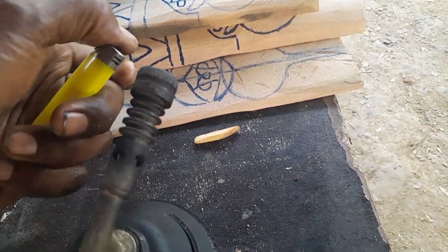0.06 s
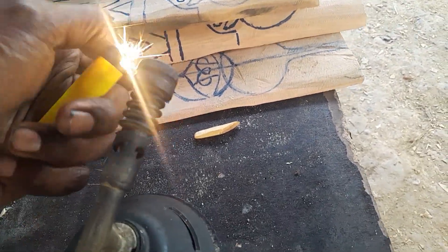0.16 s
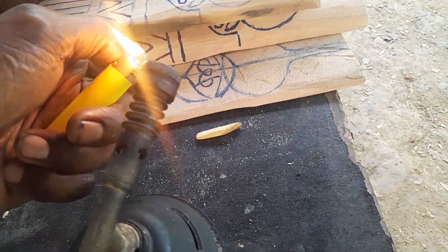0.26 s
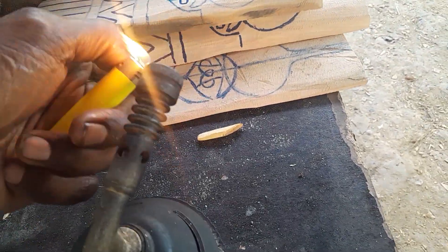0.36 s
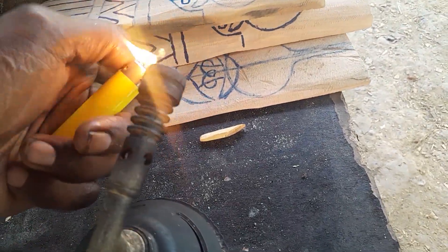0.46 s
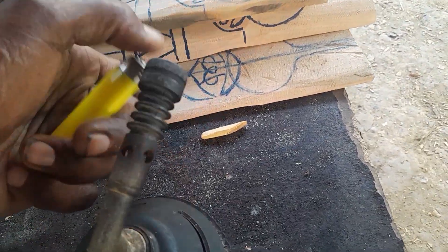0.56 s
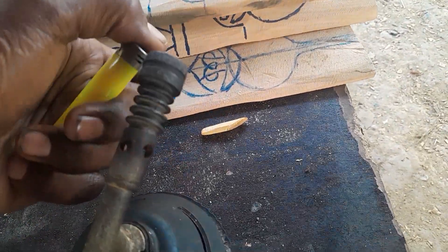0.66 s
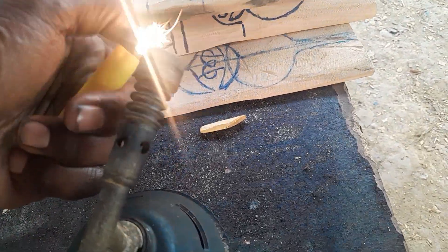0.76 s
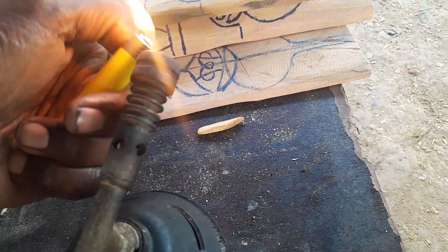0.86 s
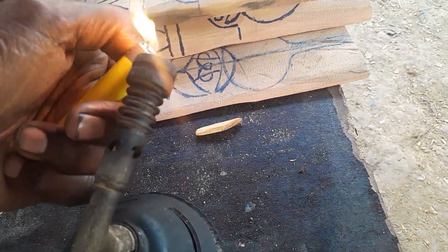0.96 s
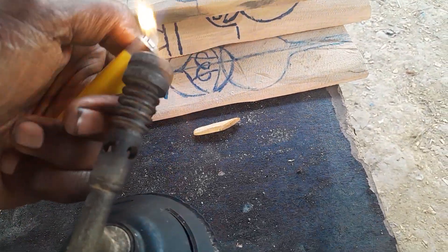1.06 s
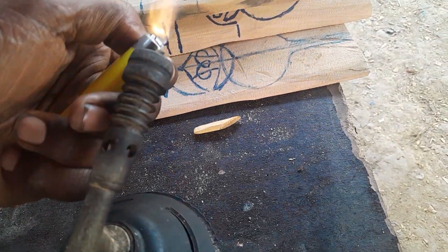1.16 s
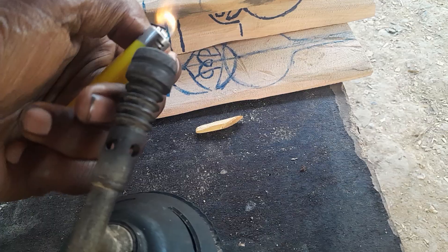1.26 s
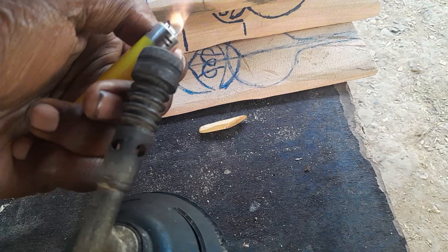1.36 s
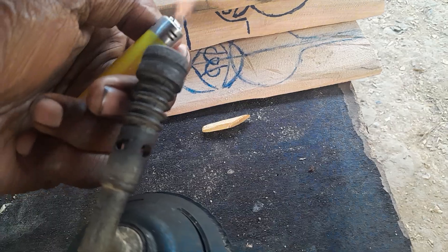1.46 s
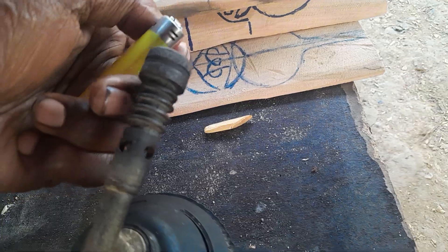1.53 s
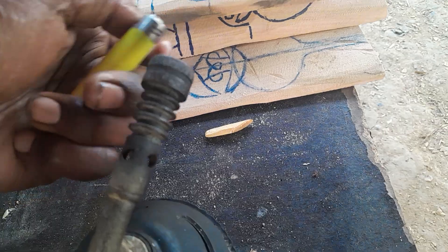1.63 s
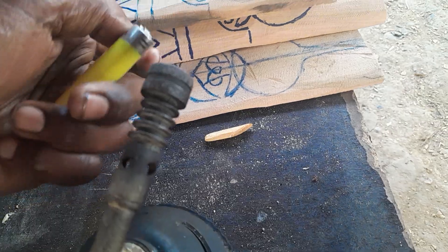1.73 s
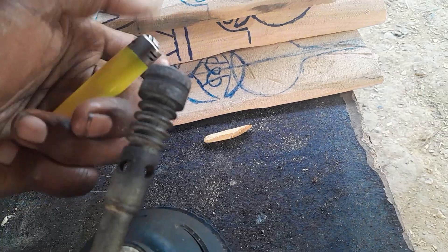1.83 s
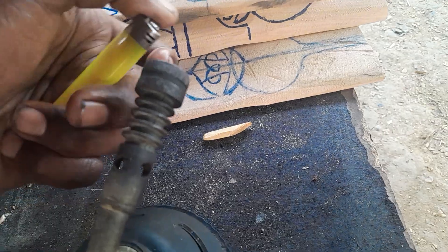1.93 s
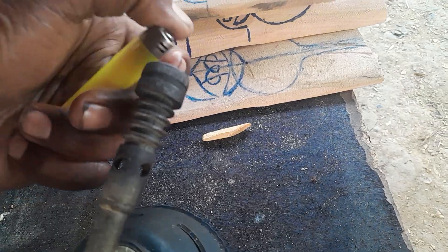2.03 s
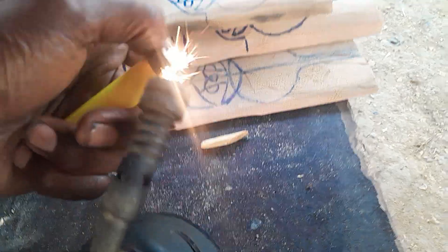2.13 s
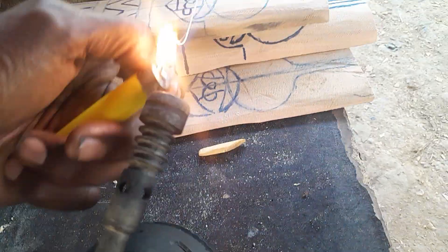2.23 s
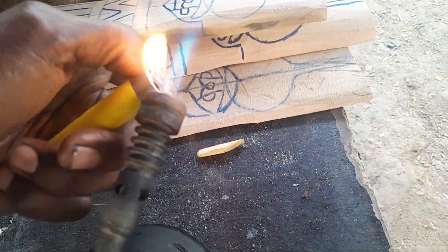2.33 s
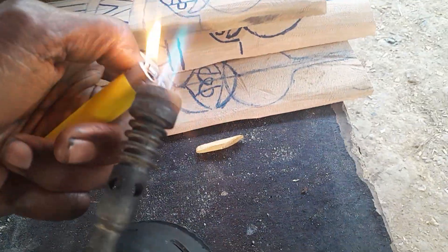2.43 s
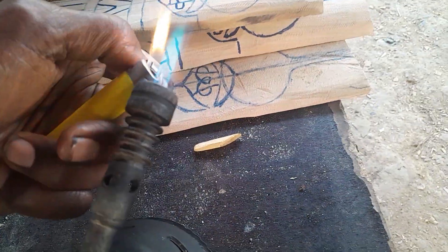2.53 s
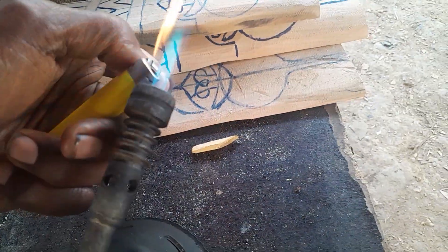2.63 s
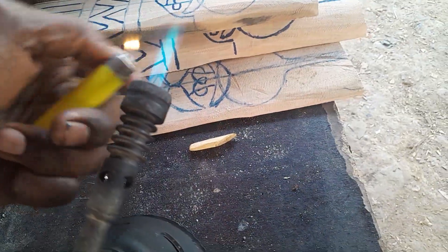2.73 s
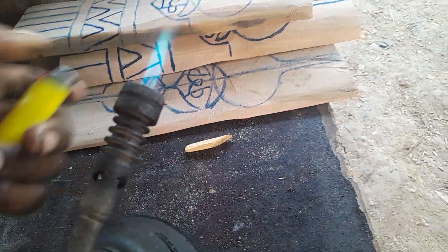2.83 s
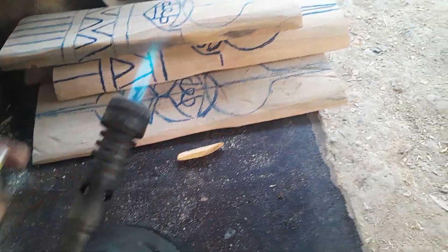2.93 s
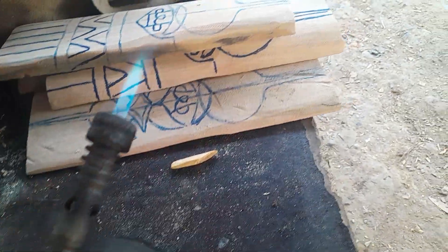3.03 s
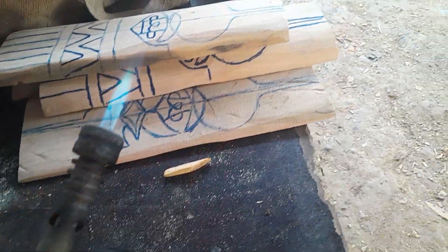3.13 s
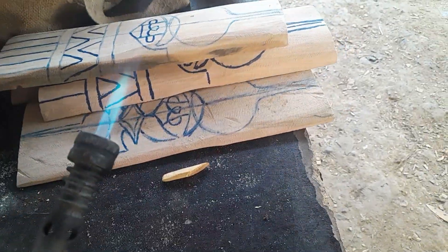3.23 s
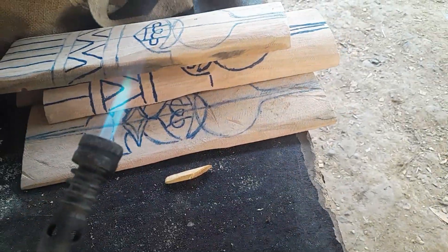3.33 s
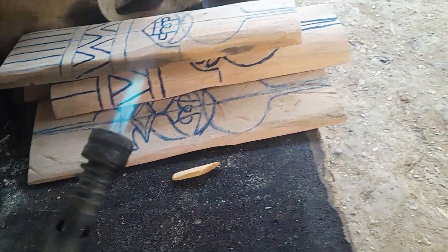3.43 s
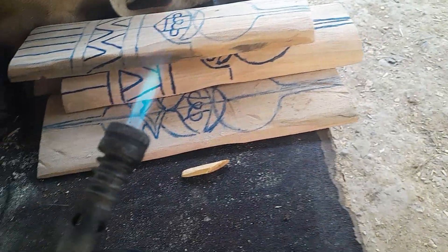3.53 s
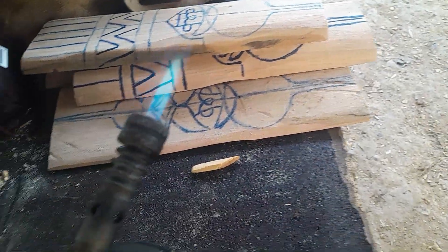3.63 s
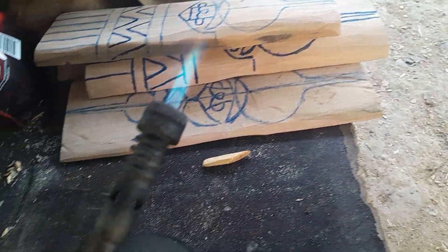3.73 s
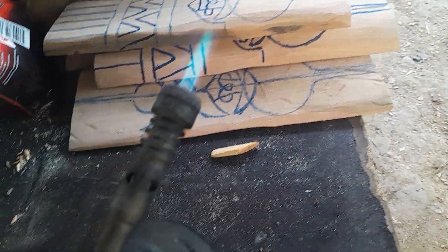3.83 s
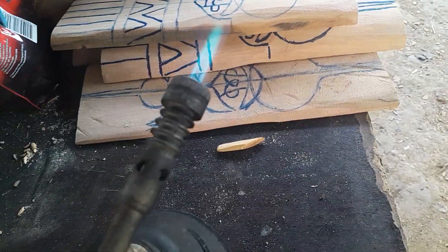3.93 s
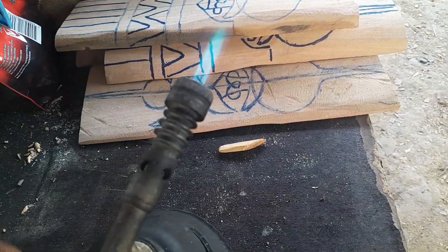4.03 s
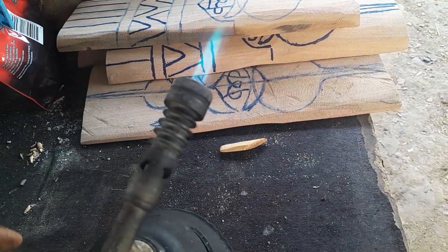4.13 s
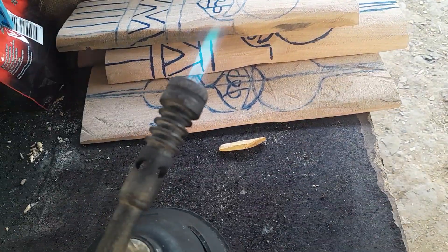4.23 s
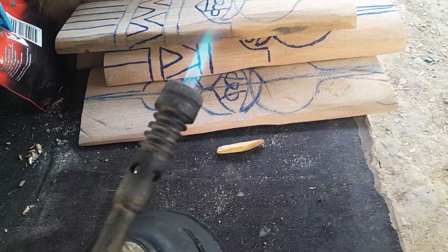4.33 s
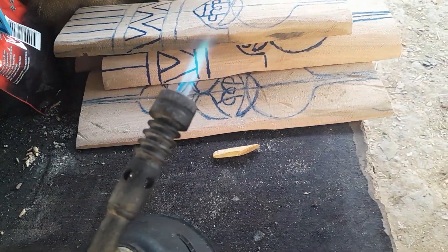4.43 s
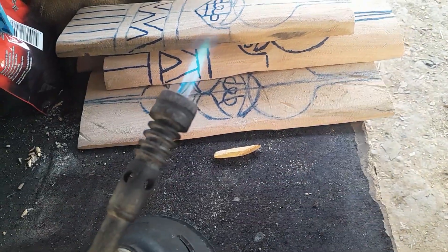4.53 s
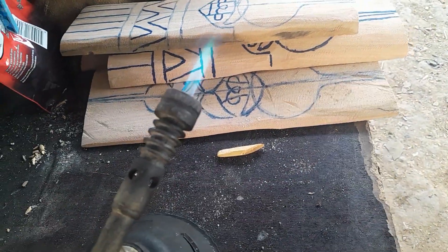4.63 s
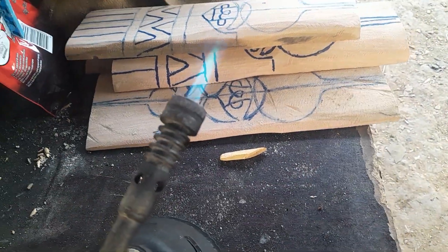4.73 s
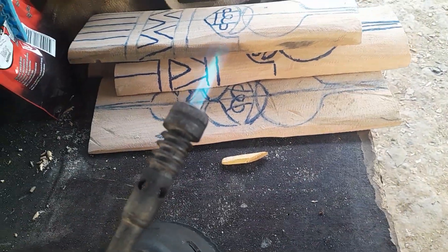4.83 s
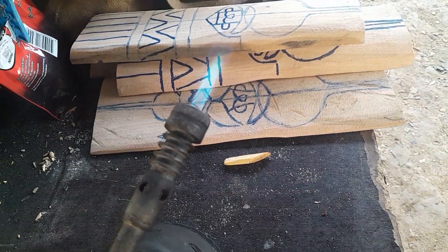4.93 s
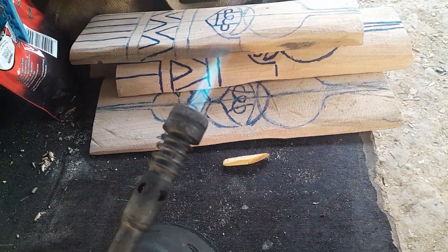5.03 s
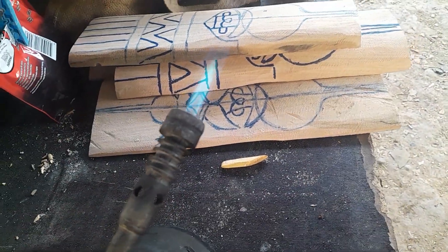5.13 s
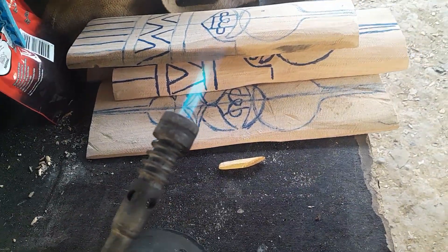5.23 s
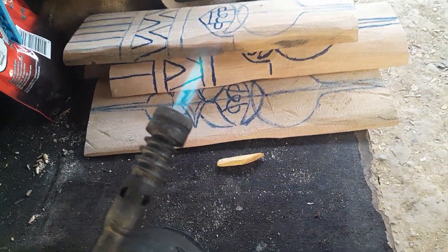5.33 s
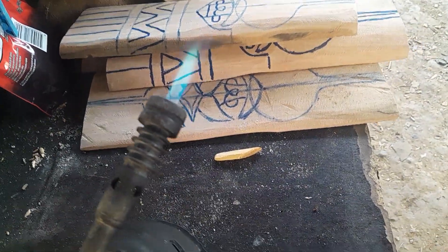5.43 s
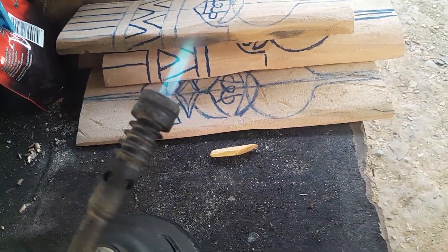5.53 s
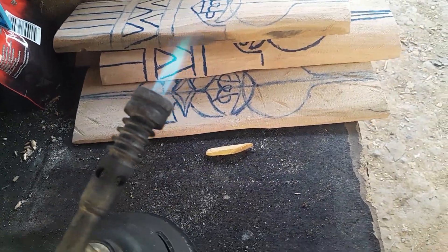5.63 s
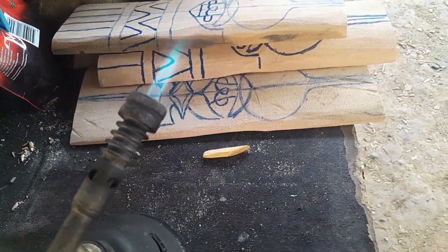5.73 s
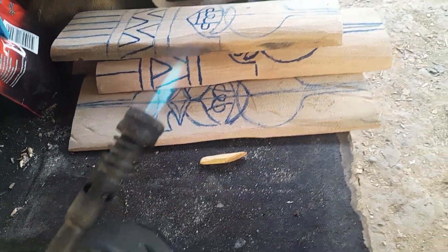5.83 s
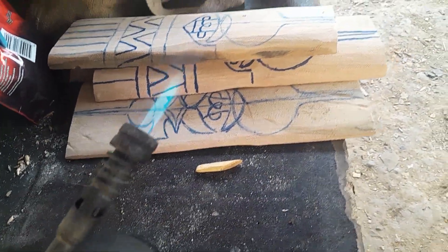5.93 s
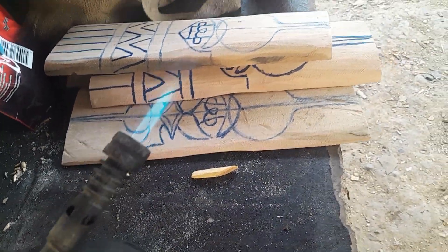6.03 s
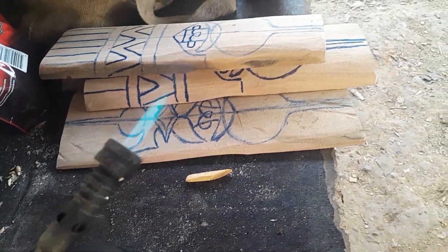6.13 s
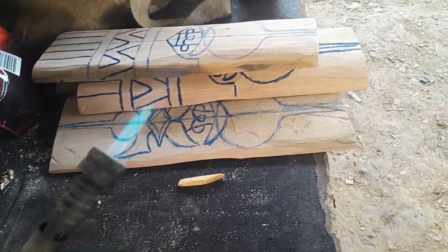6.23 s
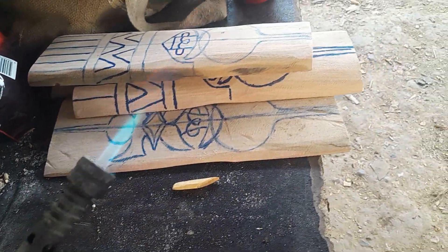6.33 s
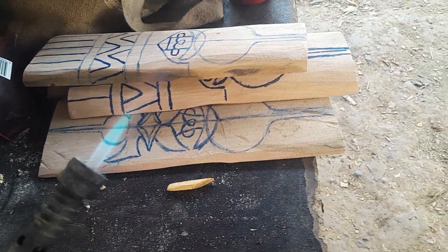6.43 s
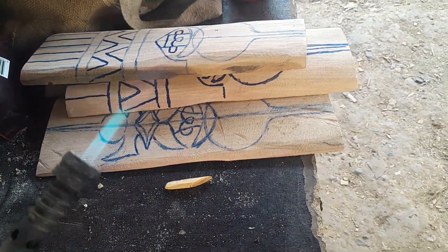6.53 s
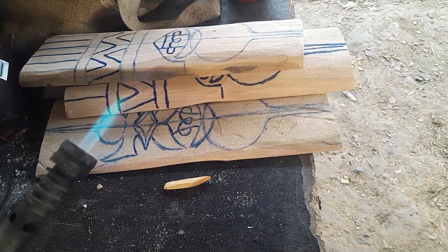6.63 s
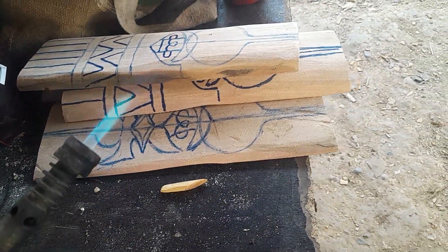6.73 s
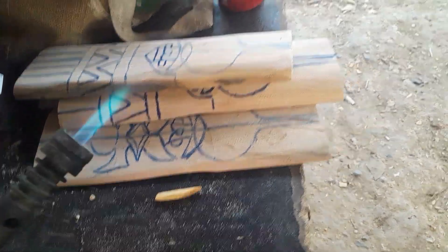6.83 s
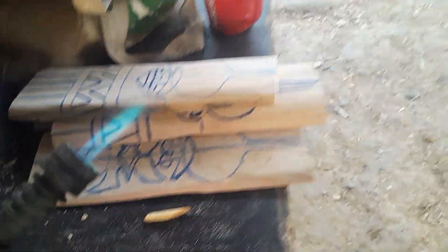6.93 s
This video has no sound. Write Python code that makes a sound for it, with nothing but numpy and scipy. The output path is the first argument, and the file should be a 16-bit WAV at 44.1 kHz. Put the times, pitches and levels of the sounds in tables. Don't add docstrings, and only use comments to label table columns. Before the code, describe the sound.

Close up, a lighter wheel snaps beside softly whistling gas; a flame sputters out, the next strike ignites a rushing blowtorch, and the lighter rattles down.

```python
import sys
import numpy as np
from scipy import signal
from scipy.fft import rfft, irfft, next_fast_len
from scipy.io import wavfile
from scipy.ndimage import uniform_filter1d

SR = 44100
rng = np.random.default_rng(int(sys.argv[2]) if len(sys.argv) > 2 else 0)


def dump_mix(stems):
    frames = np.atleast_2d(stems).T
    limited = np.clip(frames, -1, 1)
    pcm = np.round(limited * 32767).astype(np.int16)
    wavfile.write(sys.argv[1], SR, pcm)


def gain_from_decibels(decibels):
    exponent = np.asarray(decibels, float) / 20
    return 10 ** exponent


N = 307818
HZ = np.fft.rfftfreq(1024, 1 / SR)[:, None]

# time_s, burn_db (below full)
LAZY = [(0.992, -6.5), (1.012, -6.5), (1.034, -16.5), (1.06, -11.5), (1.202, 1.5), (1.37, -5),
        (1.452, -1.5), (1.582, -5.5), (1.612, -27)]
# time_s, burn_db (below full)
CATCH = [(2.208, -14), (2.254, -9.5), (2.278, -19.5), (2.308, -4.5), (2.39, -0.5), (2.41, -3)]
# time_s, burn_db, treble_db (as the nozzle faces the ports)
JET = [(2.43, 6, -1.5), (2.7, 2, 1.5), (2.93, 1, -1), (3.15, 1, 1), (3.83, 0.95, -0.5), (5.18, -0.3, 1.6),
       (6.08, 0, -0.5), (6.3, -0.4, 1), (6.98, 0.5, -2.5)]
# time_s, left_port_lag_samples, board_echo_ms
TORCH = [(0, 3, 1.22), (1.85, 3.5, 1.28), (2.6, 3, 1.36), (3.15, 0.2, 1.56), (3.55, 0.9, 1.85),
         (3.9, 4, 1.83), (4.3, 4, 1.81), (5.1, 4.5, 1.78), (5.6, 2.5, 1.88), (6.4, 0.4, 1.7),
         (6.75, 0, 1.65), (7, -1.6, 1.29)]


def evened(x):
    return x / np.sqrt(np.mean(abs(x) ** 2) + 1e-20)


def read(points, hz):
    f, value = np.transpose(points)
    return np.interp(np.log(hz + 1), np.log(f + 1), value)


def columns(tables, t):
    s, *rest = np.vstack(tables).T
    return [np.interp(t, s, c) for c in rest]


def coloured(x, tone):
    count = x.shape[-1]
    size = next_fast_len(count)
    gain = gain_from_decibels(read(tone, np.fft.rfftfreq(size, 1 / SR)))
    return evened(irfft(rfft(x, size) * gain, size)[..., :count])


def resonate(x, hz, width):
    turn = np.exp(2j * np.pi * np.cumsum(hz * np.ones(len(x))) / SR)
    r = np.exp(-np.pi * width / SR)
    smooth = signal.lfilter([1 - r], [1, -r], x / turn)
    return 2 * (turn * smooth).real


def bump(hz, width):
    return np.exp(-.5 * ((HZ - hz) / width) ** 2)


def delay(seconds):
    return np.exp(-2j * np.pi * HZ * seconds)


def add(mix, s, sound):
    part = mix[:, round(s * SR):][:, :sound.shape[1]]
    part += sound[:, :part.shape[1]]


def spectra(x):
    return signal.stft(x, SR, nperseg=1024, noverlap=768)[1:]


def ports(z, lag, paths=1, near=1):
    # pitch_hz, left_minus_right_db
    port_balance = [(100, 0), (700, -4.5), (3000, -3.5), (5000, -0.5), (7400, 1.5), (8900, -12.5),
                    (10000, -6), (15000, -9.5)]
    # pitch_hz, likeness_share
    port_likeness = [(100, 1), (1000, 0.96), (2500, 0.9), (4500, 0.89), (7000, 0.8), (9000, 0.25),
                     (15000, .15)]
    same = np.clip(read(port_likeness, HZ), 0, 1) ** near
    heard = np.array([z[0] * delay(lag / SR), z[0]]) * paths
    scattered = np.sqrt(1 - same ** 2) * z[1:] * abs(paths)
    half = np.array([.5, -.5])[:, None, None]
    pair = (same * heard + scattered) * gain_from_decibels(half * read(port_balance, HZ))
    return signal.istft(pair, SR, nperseg=1024, noverlap=768)[1][:, :N]


def drifting(count):
    drift_db, blur_hz, blur_s = 1.3, 220, .7
    field = rng.standard_normal((len(HZ), count))
    for _ in range(2):
        field = uniform_filter1d(field, round(blur_hz / HZ[1, 0]), 0)
        field = uniform_filter1d(field, round(blur_s * SR / 256), 1)
    return drift_db * evened(field) * np.clip(HZ / 3500, 0, 1) ** 2


def leak():
    # time_s, hiss_db, whistle_hz
    gas_flow = [(0, -60.5, 4250), (.33, -59.5, 4250), (.48, -62.5, 4250), (.55, -59.5, 4280),
                (.76, -61.5, 4200), (.95, -59, 4070), (1.66, -59.5, 4460), (1.82, -60, 4450),
                (1.95, -61, 4270), (2.1, -59, 3940)]
    # pitch_hz, level_db (per Hz)
    hiss_tone = [(130, -9), (400, -15), (1400, -30.5), (2700, -17), (3500, -9), (4250, -0.5), (5000, -4),
                 (5800, -5), (6550, -11), (8500, -8), (9700, -18.5), (11200, -7), (12500, -18.5),
                 (16000, -15)]
    # time_s, swell_db
    rumble_swells = [(.104, -4), (.16, 4), (.45, 4), (.68, 6), (.76, 3), (.9, 10), (1.66, 10), (1.75, 6),
                     (2.0, 11), (2.09, 12)]
    t = np.arange(N) / SR
    hiss_db, whistle_hz = columns([gas_flow], t)
    rumble_db, swell_s = -68.5, 0.032
    rumble_db += sum(db * np.exp(-((t - s) / swell_s) ** 2) for s, db in rumble_swells)

    gas = coloured(rng.standard_normal((3, N)), hiss_tone)
    gas[0] += gain_from_decibels(-3.5) * evened(resonate(rng.standard_normal(N), whistle_hz, 280))
    ft, z = spectra(gas * gain_from_decibels(hiss_db))
    z = z * gain_from_decibels(0.44 * drifting(len(ft)))
    hiss = ports(z, columns([TORCH], ft)[0], near=1.5)

    low = rng.standard_normal((4, N))
    rumble = evened(resonate(resonate(low[0], 57, 7.3), 57, 30))
    rumble += gain_from_decibels(-14.5) * evened(resonate(resonate(low[1], 140, 50), 105, 80))
    rumble = rumble * gain_from_decibels(rumble_db + np.array([[2.], [-2.]]))
    hush = gain_from_decibels(-77) * np.diff(low[2:], prepend=0)
    return hiss + rumble + hush


def strike(row, tone):
    # pitch_hz, level_db (per Hz)
    scrape_tone = [(700, -45), (1100, -24.5), (2100, -5), (3700, 2), (7000, -1.5), (9700, -14),
                   (12500, -1.5), (16000, -15)]
    s, snap_db, before_db, after_db, rebound_db = row
    t = np.arange(-.08, .14, 1 / SR)
    early, late = np.minimum(t, 0), np.maximum(t, 0)
    snap = gain_from_decibels(snap_db) * np.exp(-(t / 0.0022) ** 2)
    snap += gain_from_decibels(rebound_db) * np.exp(-((t - .0095) / 0.0012) ** 2)
    noise = rng.standard_normal((3, len(t))) * gain_from_decibels(2 * rng.standard_normal(len(t)))
    grit = coloured(noise, tone)
    speeding_up = 0.73 * np.exp(early / 0.02) + 1.0 * np.exp(early / 0.0067)
    scrape = coloured(noise, scrape_tone) * gain_from_decibels(before_db) * speeding_up
    trail = grit * gain_from_decibels(after_db) * np.exp(-late / 0.012)
    thump = gain_from_decibels(-40 - 60 * late / 0.16) * np.sin(2 * np.pi * 62 * late) * np.clip(late / 0.016, 0, 1)
    thump += gain_from_decibels(-46.5 - 60 * late / 0.034) * np.sin(2 * np.pi * 330 * late)
    thump += gain_from_decibels(-53.0 - 60 * late / 0.15) * np.sin(2 * np.pi * 140 * late)
    return s + t[0], grit * snap + np.where(t < 0, scrape, trail) + thump


def ring(row):
    s, hz, db, t60, length = row
    t = np.arange(0, .1, 1 / SR)
    wobble = 1 + .35 * evened(uniform_filter1d(rng.standard_normal(len(t)), 150))
    held = np.clip(t / .003, 0, 1) * np.clip((length - t) / .006, 0, 1)
    tone = gain_from_decibels(db - 60 * t / t60) * np.sin(2 * np.pi * hz * t)
    return s, np.array([[1], [.3], [-.3]]) * tone * wobble * held


def knock(row):
    # pitch_hz, level_db, time_to_fall_60_db_s
    shell_modes = [(190, -19, 0.065), (383, -22, 0.07), (580, -5, 0.036), (890, 0, 0.028),
                   (1170, -1, 0.046), (1670, -1.5, 0.033), (2230, -5.5, 0.034), (3240, -32, 0.016),
                   (6280, -10, .02), (7450, -19, 0.023)]
    s, db, hz, treble_db, pan_db = row
    t = np.arange(-.002, .05, 1 / SR)
    late = np.maximum(t, 0)
    fade = (np.exp(-late / .0015) + 0.12 * np.exp(-late / 0.018)) * np.clip(t / 0.00077, 0, 1)
    one, other = rng.standard_normal((2, len(t))) * fade
    crack_tone = [(500, -14), (0.44 * hz, -9), (hz, 0), (min(1.57 * hz, 7900), -7),
                  (9000, treble_db + 6.5), (16000, treble_db)]
    crack = coloured(np.array([one, 0.16 * np.roll(one, -3) + 0.51 * other]), crack_tone)
    crack = crack / abs(crack).max()
    edge_share = .6 if db < -35 else .15
    edge = edge_share * np.sin(2 * np.pi * hz * late) * np.exp(-((t - .0012) / 0.00035) ** 2)
    shell = 0
    shake = rng.uniform(-1, 1, (len(shell_modes), 2))
    for (f, mode_db, t60), (u, v) in zip(shell_modes, shake):
        fall = gain_from_decibels(mode_db + 2.0 * u - 60 * late / t60)
        shell = shell + fall * np.sin(2 * np.pi * f * (1 + 0.079 * v) * late)
    shell_gain = gain_from_decibels(-11 + 1.25 * (db + 17.5))
    pan = np.array([[.5], [-.5]]) * pan_db
    return s + t[0], gain_from_decibels(db + 1.5 + pan) * (crack + edge + shell_gain * shell)


def alight(t):
    return np.digitize(t, [(LAZY[-1][0] + CATCH[0][0]) / 2, JET[0][0]])


def burning(t):
    # roar_db, body_db, rush_db, fizz_db
    full_burn = [
        (-31.5, -37.5, -47, -56),
        (-31.5, -33, -44.5, -52),
        (-33, -36.5, -52.5, -64.5),
    ]
    # roar_db, body_db, rush_db, fizz_db
    burn_follow = [
        (0.74, 0.94, 1, 0.83),
        (.2, 1.0, 0.75, 0.56),
        (0.3, 1.0, 0.26, 0.89),
    ]
    facing_share = (0, 0.34, 1.0, 0.41)
    lazy_mix, jet_mix = 0.087, .89
    which = alight(t)
    burn_db = np.choose(which, [columns([flame_table], t)[0] for flame_table in (LAZY, CATCH, JET)])
    turn_db = columns([JET], t)[1] * (which == 2)
    want_db = np.array(full_burn)[which].T + np.array(burn_follow)[which].T * burn_db
    want_db = want_db + np.outer(facing_share, turn_db)
    jet = np.interp(t, [CATCH[-1][0], JET[0][0]], [lazy_mix, jet_mix])
    return want_db, np.clip(jet, 0, 1)


def burnouts(jet):
    per_s = 2500 + 6000 * jet
    size = gain_from_decibels((5.0 - 2.5 * jet) * np.minimum(rng.exponential(1, (3, N)), 4))
    dips = -size * (rng.random((3, N)) < per_s / SR)
    dips -= uniform_filter1d(dips, 4000)
    dips /= np.sqrt(uniform_filter1d(dips ** 2, 6000) + 1e-9)
    flutter = evened(uniform_filter1d(rng.standard_normal(N), 350))
    turbulence = rng.standard_normal((3, N))
    return (0.92 * dips + 0.55 * turbulence) * gain_from_decibels((1.44 - 0.73 * jet) * flutter)


def flame_colour(ft):
    # low_hz, high_hz
    flame_bands = [(80, 500), (500, 3000), (4000, 7500), (9000, 15000)]
    # pitch_hz, level_db (per Hz)
    lazy_tone = [(18, -66), (30, -18), (61, -3.5), (153, -9.5), (184, -9), (373, -5.5), (702, -20.5),
                 (1160, -15.5), (2410, -31), (3670, -26.5), (4410, -31.5), (16000, -62.5)]
    # pitch_hz, level_db (per Hz)
    jet_tone = [(18, -50), (30, -17), (81, -20.5), (149, -6), (319, 2), (426, -2.5), (512, -14.5),
                (599, -10.5), (739, -12), (1070, -13.5), (1430, -22), (1950, -21), (3870, -23),
                (4530, -22.5), (16000, -59)]
    # pitch_hz, width_hz, level_db
    nozzle_modes = [(155, 41, 3.5), (596, 31, 4), (1810, 52, -1.5), (1966, 110, 3), (3060, 99, 1),
                    (3600, 240, 1.6), (3900, 170, -3), (4570, 200, 3.5), (5140, 170, -1.5), (5870, 1200, 4),
                    (7390, 790, 4.5), (9030, 440, 0), (9470, 520, -3.5), (11300, 750, -2), (13900, 300, 5)]
    # lazy_db, catching_db, jet_db
    flap_db = (5, 7.5, 0)
    want_db, jet = burning(ft)
    lazy_db = read(lazy_tone, HZ)
    tone_db = lazy_db + np.clip(jet, 0, 1) * (read(jet_tone, HZ) - lazy_db)
    tone_db = tone_db + sum(db * bump(hz, width / 2) for hz, width, db in nozzle_modes)
    tone_db = tone_db + np.array(flap_db)[alight(ft)] * bump(145, 35)

    have_db = []
    for lo, hi in flame_bands:
        power = (gain_from_decibels(tone_db) ** 2 * (HZ > lo) * (HZ < hi)).sum(0)
        have_db.append(10 * np.log10(power / len(HZ)))
    short_db = np.array(want_db) - have_db
    centres = np.log(np.sqrt(np.prod(flame_bands, 1)))
    log_hz = np.log(HZ[:, 0] + 1)
    weights = np.array([np.interp(log_hz, centres, row) for row in np.eye(len(centres))])
    return tone_db + weights.T @ short_db + drifting(len(ft))


def echoes(ft, board_ms):
    board_share = (.2, .14)
    # delay_ms, share
    left_echoes = [(.8, -0.09), (.95, 0.24), (1.1, 0.2), (1.27, -0.23), (2.05, -0.11), (3.05, -0.13)]
    # delay_ms, share
    right_echoes = [(.77, -0.01), (.9, 0.19), (1.67, 0.037), (1.98, 0.047), (2.8, -0.14), (2.98, -0.0044)]
    board = delay(board_ms / 1000)
    dull = np.exp(-HZ / 5000)
    paths = []
    for share, side in zip(board_share, (left_echoes, right_echoes)):
        ground = sum(g * delay(ms / 1000) for ms, g in side)
        paths.append(1 + share * board + dull * ground)
    paths = np.array(paths)
    paths[0] *= gain_from_decibels(-5 * (alight(ft) < 2) * bump(3200, 410))
    return paths


def flame():
    # start_s, peak_db
    flare_ups = [(0.991, -28), (1.041, -21), (1.1028, -15.5), (1.2351, -25.5), (1.3838, -28), (1.433, -28),
                 (1.4626, -21.5), (1.513, -17.5), (2.2194, -38), (2.2464, -31), (2.2917, -38),
                 (2.3934, -44), (2.5551, -29)]
    lights_s, kindle_s, out_s, relights_s, pop_s = .981, .014, 1.618, 2.203, .01
    t = np.arange(N) / SR
    kindling = np.clip((t - lights_s) / kindle_s, 0, 1) ** 2
    dying = np.clip((out_s - t) / kindle_s, 0, 1)
    lit = kindling * dying + np.clip((t - relights_s) / pop_s, 0, 1)
    ft, z = spectra(burnouts(burning(t)[1]))
    z = z * gain_from_decibels(flame_colour(ft))
    lag, board_ms = columns([TORCH], ft)
    surge = np.ones(N)
    for s, db in flare_ups:
        surge += gain_from_decibels(db + 24.0) * np.exp(-np.maximum(t - s, 0) / 0.0047) * (t > s)
    return ports(z, lag, echoes(ft, board_ms)) * lit * surge


def scene():
    # start_s, snap_db, scrape_before_db, scrape_after_db, rebound_db
    strike_rows = [
        (0.2215, -19, -40.5, -27, -33),
        (0.8276, -18, -36, -29, -34.5),
        (2.1815, -18, -36, -30, -41),
    ]
    # pitch_hz, level_db (per Hz)
    strike_tones = [
        [(100, -17.5), (1700, -22.5), (2800, -17.5), (3700, -3.5), (5100, -11), (6900, 2.5), (8300, -8.5),
         (11000, -16.5), (13800, -3.5), (16000, -23)],
        [(100, -18), (1000, -25), (1800, -13), (3000, -17), (4700, 1), (5600, -12), (7000, -7), (8700, -18.5),
         (10400, -0.5), (12200, -11), (14600, -7), (16000, -14)],
        [(100, -8), (1500, -12), (2600, -17.5), (4400, 1.5), (5500, -5.5), (7000, -1), (8300, 2.5), (9500, -17),
         (10700, -5), (13000, -10), (16000, -13.5)],
    ]
    # start_s, pitch_hz, level_db, time_to_fall_60_db_s, length_s
    cap_rings = [
        (.232, 1793, -49.5, 0.18, .1),
        (.842, 1797, -52, 0.21, .1),
        (2.181, 832, -29, 0.17, 0.031),
        (2.179, 1650, -25.5, 0.058, 0.026),
        (2.217, 1700, -28.5, 0.047, 0.014),
    ]
    # start_s, peak_db, ring_hz, treble_db, left_minus_right_db
    knock_rows = [
        (0.511, -42.5, 4760, -11, -14),
        (1.837, -40.5, 4580, 5, -9),
        (1.9775, -53, 5800, -12, -9),
        (4.0441, -17, 4100, -27, -9),
        (4.055, -14.5, 5960, -20, 4),
        (4.0730, -16, 2330, -26.5, -10),
        (4.081, -18.5, 1340, -38, 10.5),
        (4.1381, -16.5, 3200, -26.5, -3.5),
        (4.1726, -20, 5240, -19, -4),
        (4.1832, -35.5, 6140, -27, -1),
    ]
    wheel = np.zeros((3, N))
    for row, tone in zip(strike_rows, strike_tones):
        add(wheel, *strike(row, tone))
    for row in cap_rings:
        add(wheel, *ring(row))
    mix = leak() + ports(spectra(wheel)[1], 2.3, near=0.64) + flame()
    for row in knock_rows:
        add(mix, *knock(row))
    return mix


def roll_off(x):
    return signal.sosfilt(signal.butter(12, 16130, fs=SR, output="sos"), x)


def record(dry):
    top_cut = signal.firwin(255, 16000, fs=SR)
    bass_cut = signal.butter(4, 44, "high", fs=SR, output="sos")
    mix = signal.oaconvolve(dry, top_cut[None], "same")
    mix = signal.sosfilt(bass_cut, mix)
    return roll_off(mix)


dry = scene()
out = record(dry)
dump_mix(out)
```